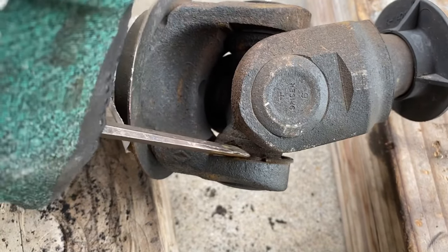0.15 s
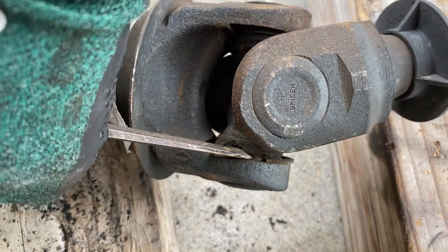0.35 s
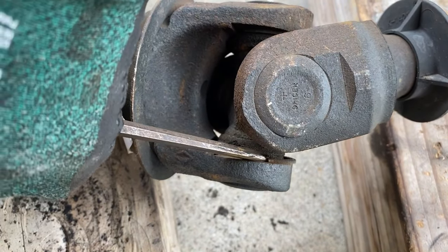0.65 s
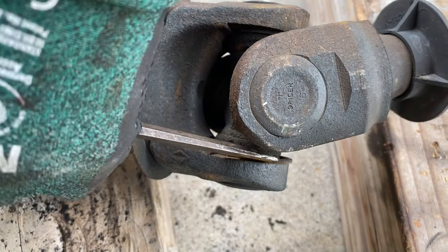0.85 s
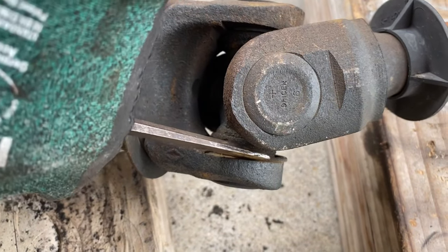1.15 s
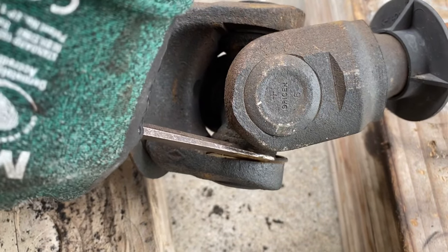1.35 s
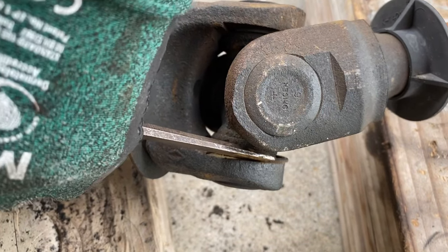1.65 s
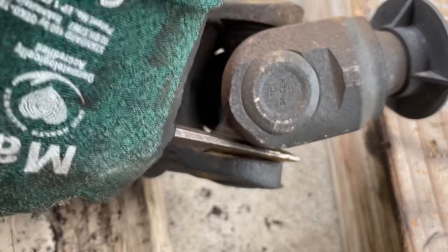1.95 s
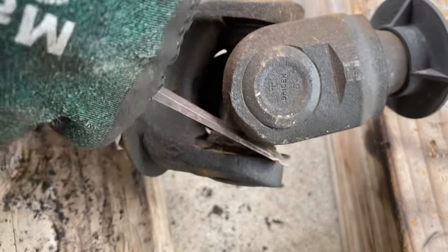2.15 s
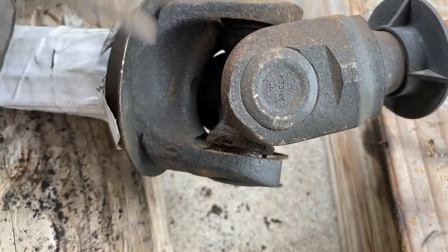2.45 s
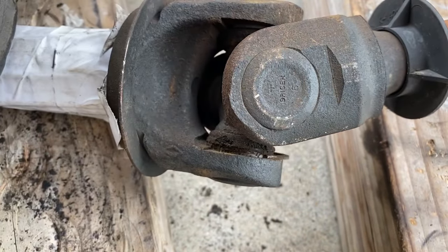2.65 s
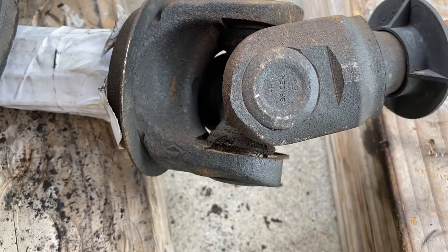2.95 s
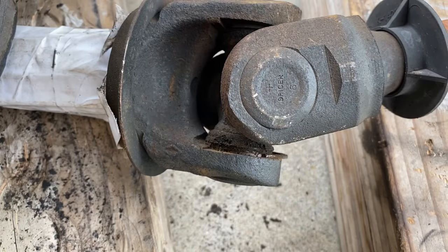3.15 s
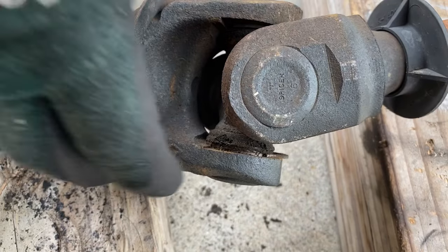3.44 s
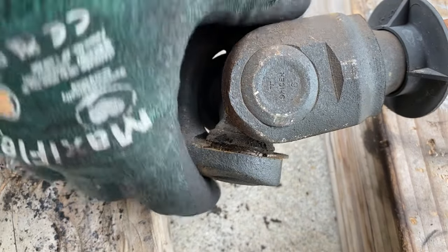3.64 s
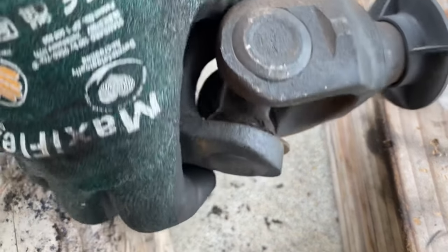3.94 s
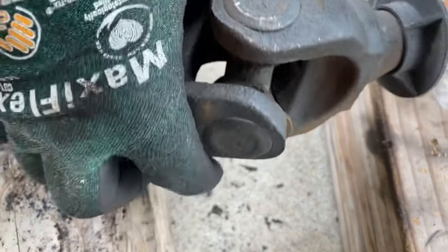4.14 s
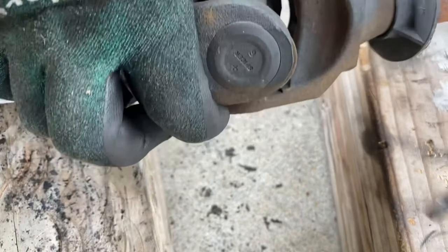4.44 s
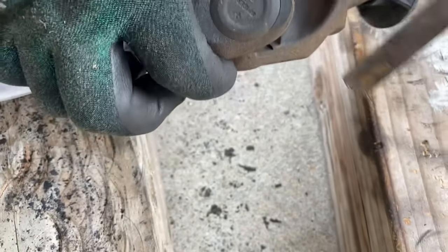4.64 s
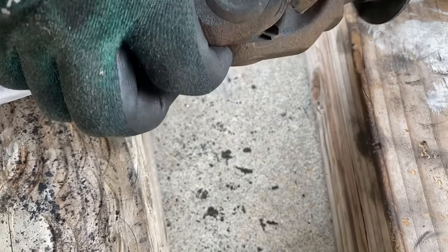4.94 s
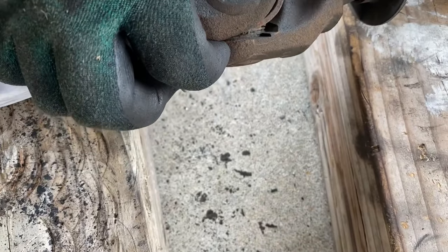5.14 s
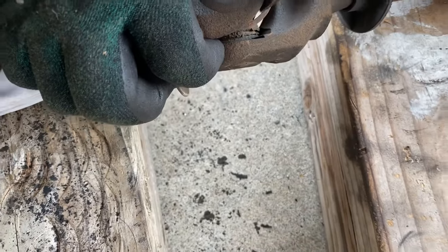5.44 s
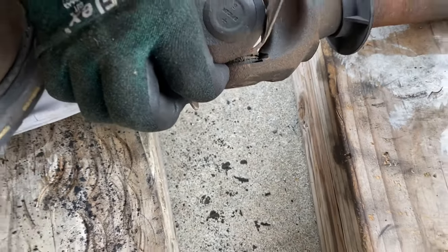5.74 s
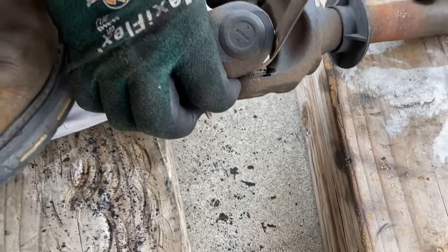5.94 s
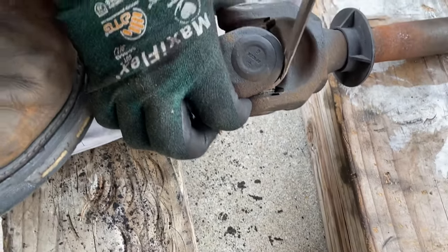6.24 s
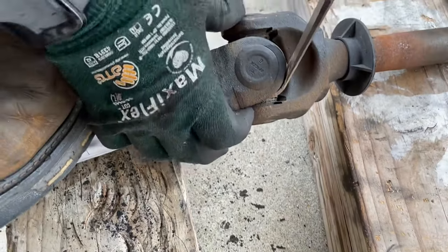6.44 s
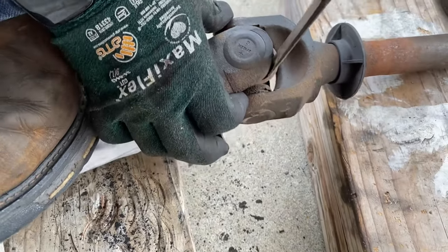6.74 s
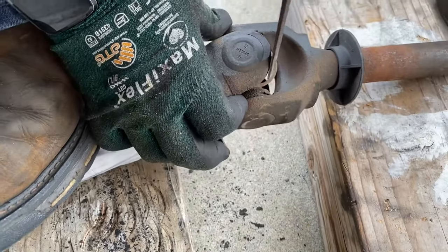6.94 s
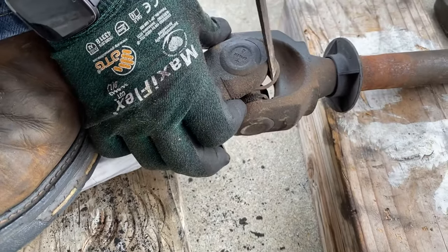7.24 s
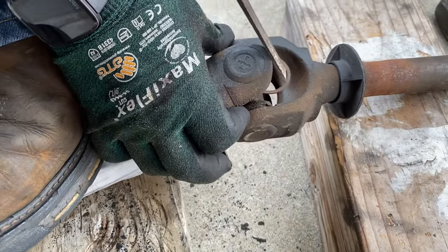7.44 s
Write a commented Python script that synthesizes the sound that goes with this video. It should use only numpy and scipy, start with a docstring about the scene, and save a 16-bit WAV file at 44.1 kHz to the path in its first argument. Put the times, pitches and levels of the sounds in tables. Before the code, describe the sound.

Close outdoor repair sounds: small metallic clacks, a tool clink, gloved rubbing, a dull clattering roll on wood, more picking, and a bright final ping.

```python
"""A steel blade scrapes and clacks on a drive shaft's joint, close to a phone outdoors, over a low rumble.
It slips with a loud crack and is put down; a gloved hand rubs, and the shaft rolls over on timber blocks.
More picking follows, with thin squeaks now and then throughout, until the steel circlip springs free, ringing.
Knocks are fading tones plus a noise crack; scrapes are uneven clicks sent through the same kind of tones.
The glove, the rumble and the echoes are made from shaped noise."""
import sys
import numpy as np
from scipy import signal
from scipy.fft import rfft, irfft, next_fast_len
from scipy.io import wavfile
from scipy.ndimage import uniform_filter1d

SR = 44100
rng = np.random.default_rng(int(sys.argv[2]) if len(sys.argv) > 2 else 0)


def dump_mix(stems):
    """Bounce the given channels to the path in sys.argv[1] as a 16-bit WAV at rate SR."""
    frames = np.atleast_2d(stems).T  # one column per channel
    limited = np.clip(frames, -1, 1)  # hard clip at full scale
    pcm = np.round(limited * 32767).astype(np.int16)
    wavfile.write(sys.argv[1], SR, pcm)


N = 334719
T = np.arange(N) / SR  # time through the scene, s
AGE = T[:SR // 3]  # time since one contact began, s
TOP_HZ = 16400  # upper limit of the sound

# Limits of five pitch ranges: thump, body, clank, tick, sizzle; column: edge_hz
RANGE_EDGES_HZ = (50, 250, 1300, 4000, 11500, 16500)
RANGE_CENTRES_HZ = np.sqrt(np.array(RANGE_EDGES_HZ[:-1]) * np.array(RANGE_EDGES_HZ[1:]))
# Brightness tilts the spectrum about these pitches
STEEL_PIVOT_HZ, TIMBER_PIVOT_HZ = 2260, 560

# Low background rumble, relative; columns: pitch_hz, level_db (per Hz)
RUMBLE_SPECTRUM = [(20, -24), (35, -13.5), (55, -9.5), (76, 4), (101, -5.5), (130, 1), (168, -7),
                   (210, -14), (241, -15), (285, -24), (319, -21), (440, -23), (560, -37), (1500, -54),
                   (6000, -73)]
RUMBLE_DB = -52

# Steel dragged on rusty steel; columns: hardest_s, rise_s, fall_s, strength_db, brightness_db_per_octave
SCRAPE_STROKES = [(0.045, 0.045, 0.043, -44.5, -2.5), (0.58, 0.048, .3, -58, -1.5),
                  (0.69, 0.027, 0.12, -54.5, -5.5), (1.14, 0.034, 0.066, -61, -3),
                  (1.23, 0.018, 0.1, -57.5, -4.5), (1.965, 0.029, 0.03, -49.5, -0.7),
                  (2.179, 0.1, 0.093, -50, 1.6), (4.191, 0.06, 0.12, -42.5, -5.5),
                  (4.945, 0.051, 0.15, -52.5, 0.5), (5.382, .04, 0.045, -48.5, -0.7),
                  (6.2, 0.026, 0.14, -53, 0), (6.6, 0.082, 0.24, -49, 1), (7.429, 0.019, 0.014, -46.5, 1),
                  (7.462, 0.021, 0.031, -26, 1.9)]
# How a scrape shares its energy; columns: thump_db, body_db, clank_db, tick_db, sizzle_db
SCRAPE_BALANCE = (-5, 0.5, 0, -4, -14.5)
# Tones of the joint, relative; columns: pitch_hz, level_db, t60_s (time to fall 60 dB)
JOINT_TONES = [(110, -12, .06), (225, -9, .04), (295, -5, .05), (400, -10, .03), (545, 0, .045),
               (770, -4, .03), (960, -6, .048), (1290, -6, .025), (1710, -3, .025), (2050, -6, .02),
               (2420, -3, .022), (2780, -5, .025), (3000, -1, .03), (4110, -2, .018), (4500, -5, .018),
               (5400, -3, .016), (5780, -4, .016), (6770, -3, .015), (7380, -2, .012), (9840, 4, .01),
               (10400, 4, .01), (13500, -9, .03)]

# Blade on joint, strength before the favoured range is raised; the row at 3.988 s is a bright click that goes
# with a knock of the shaft; columns: start_s, strength_db, brightness_db_per_octave, favoured_hz, crack_t60_s
BLADE_TAPS = [(0.0295, -53, -3.5, 3000, .012), (0.04, -45.5, -1.5, 3400, .011),
              (0.068, -44, -3, 3180, 0.016), (0.137, -52, -7, 914, .006), (0.5359, -60, -2, 2970, .016),
              (0.577, -62.5, -4, 2900, .008), (0.678, -54.5, -3.5, 551, .009),
              (0.734, -39, -2.7, 2850, 0.011), (0.735, -35.5, -4.5, 492, 0.0059),
              (1.2705, -33.5, -5, 956, 0.0084), (1.6381, -23.5, 1, 9800, 0.0078),
              (1.6401, -26.5, -0.6, 3550, 0.024), (2.01, -64.5, 7, 4130, .004),
              (2.122, -58.5, -2, 5800, 0.0036), (2.634, -67.5, 6.5, 5800, .008),
              (3.17, -53.5, -3.5, 1300, .01), (3.188, -56, -4.5, 1300, 0.044),
              (3.988, -48.5, -1.5, 4400, 0.0035), (4.8488, -40.5, -2, 2510, 0.013),
              (4.86, -56.5, -3.5, 2400, 0.0085), (4.9596, -50, -.5, 2050, 0.0071),
              (5.368, -49.5, 3.5, 3990, 0.042), (5.388, -46.5, 2.5, 3870, 0.02),
              (5.389, -52, -2.5, 533, 0.015), (6.186, -59, -2.5, 680, 0.015), (6.33, -62, -1.5, 3000, .012),
              (6.601, -51.5, -0.5, 1288, 0.0096), (6.8062, -35.5, 3, 14800, 0.014),
              (6.808, -54, -4.5, 545, 0.0094), (7.0404, -41, .2, 685, 0.0078),
              (7.066, -43, 0.6, 925, 0.029), (7.4658, -26, 2, 2320, 0.018), (7.562, -51.5, -1, 706, 0.0055)]
# How a tap shares its energy; columns: thump_db, body_db, clank_db, tick_db, sizzle_db
TAP_BALANCE = (-7.5, -3, -0.5, -2, -13.5)
# Where the blade is heard, left or right; columns: time_s, left_minus_right_db
BLADE_POSITION = [(0, 2.5), (1.3, 2), (2.1, -0.5), (4.4, -2), (7.5, 1.7)]

# Thin squeaks, pitch before its waver; columns: start_s, length_s, first_hz, last_hz, level_db
SQUEAK_GLIDES = [(0.137, 0.082, 4500, 3900, -77), (2.647, 0.25, 6250, 6200, -70),
                 (3.04, 0.057, 4500, 3830, -72.5), (4.731, 0.036, 5350, 4990, -71)]

# Strokes of the glove; columns: start_s, length_s (until release), cloth_db, fibre_above_cloth_db
GLOVE_RUBS = [(1.419, 0.12, -65.5, -17), (1.817, 0.06, -67.5, -33.5), (1.948, .31, -62.5, -6.5),
              (2.366, 0.66, -63, -17.5), (2.51, 0.14, -62.5, -0.5), (2.875, 0.11, -58.5, -3),
              (3.195, 0.21, -64, -8), (3.402, 0.19, -54.5, 2), (3.68, 0.65, -57, -6),
              (4.142, 0.06, -43, -15), (4.402, 0.18, -54.5, -1.5), (4.753, 0.19, -60.5, -9),
              (5.189, .16, -66, -1), (5.73, .19, -64, 2.5), (6.008, 0.078, -68, 9.5),
              (6.091, 0.25, -67.5, -4), (6.186, 0.046, -61.5, 9.5), (6.474, 0.23, -62, 1),
              (6.981, 0.44, -65.5, -15.5)]
RUB_ATTACK_S, RUB_RELEASE_T60_S = 0.016, .34
# A firm hold rubs steadily from this time on; fibre level is before the shared fibre setting
GRIP_S, GRIP_CLOTH_DB, GRIP_FIBRE_DB = 2.5, -74, -77
# Soft rush of cloth, relative; columns: pitch_hz, level_db (per Hz)
CLOTH_SPECTRUM = [(200, -2.5), (450, 5.5), (650, -1.5), (950, 5.5), (1500, -2.5), (2250, 0), (3000, -4),
                  (5000, -8), (6700, -11.5), (8500, -19), (12000, -38)]
# Crackle of fibres, relative; columns: pitch_hz, level_db (per Hz)
FIBRE_SPECTRUM = [(3000, -13.5), (6500, -6), (8400, -7), (10200, 2.5), (11200, -3.5), (12200, -11),
                  (13400, 1.5), (14600, -6), (15300, -6.5), (16000, -24)]
# Limits of the bands that waver separately in the cloth's rush; column: edge_hz
PATCH_LIMITS_HZ = (500, 1200, 2200, 3600, 5500, 8000)
PATCH_DB = 1.8  # typical size of that waver

# Tones of the tool, relative; columns: pitch_hz, level_db, t60_s
TOOL_TONES = [(608, -6, .055), (810, -9, .04), (1098, -5, .05), (1230, -7, .035), (1550, 2, .03),
              (1771, -1, .048), (1880, 1, .05), (2562, -11, .05), (3230, 0, .05), (3348, -9, .05),
              (4172, -8, .05), (5749, -4, .045)]
# How the tool shares its energy; columns: thump_db, body_db, clank_db, tick_db, sizzle_db
TOOL_BALANCE = (-35, -7.5, -0.5, -10, -65)
TOOL_S, TOOL_DB, TOOL_CRACK_T60_S = 2.9001, -21, 0.07

# Shaft on timber; columns: start_s, strength_db, brightness_db_per_octave, crack_t60_s
SHAFT_KNOCKS = [(3.07, -47.5, -8.5, .01), (3.5646, -14, -5.5, 0.047), (3.594, -29.5, -11, .026),
                (3.613, -38.5, -16, 0.039), (3.81, -47.5, -1, 0.0065), (3.835, -30.5, -12.5, .02),
                (3.8642, -25, -1, 0.14), (3.874, -13, -2, 0.014), (3.921, -25, -5.5, 0.044),
                (3.949, -25.5, -7.5, 0.013), (3.9709, -23.5, -4.2, 0.01), (3.9869, -24.5, -7, 0.013),
                (4.0002, -26.5, -3, 0.0068), (4.01, -29.5, -6.5, 0.015), (4.0618, -29.5, -8, .02),
                (4.07, -29.5, -9, .02), (4.1, -34.5, -6, 0.05), (4.117, -38, -7.5, .028)]
# How a knock shares its energy; columns: thump_db, body_db, clank_db, tick_db, sizzle_db
KNOCK_BALANCE = (-6.5, 0.5, 0, -12, -21.5)
# Tones of the shaft, relative; columns: pitch_hz, level_db, t60_s
SHAFT_TONES = [(100, 0, .07), (138, -2, .07), (325, -2, .05), (365, 0, .055), (470, -7, .03),
               (560, -5, .035), (781, 3, .035), (960, 0, .025), (1180, 4, .03), (1590, -4, .025),
               (1990, 1, .028), (2360, -10, .03), (2760, -9, .03), (3240, -10, .03), (3900, -12, .025)]
# A knock's upper limit: at brightness 0, its lowest value, and the brightness step that doubles it
KNOCK_HARD_HZ, KNOCK_SOFT_HZ, KNOCK_DOUBLING_DB_PER_OCTAVE = 7800, 1930, 2.7
# Shaft rumbling on timber; columns: hardest_s, rise_s, fall_s, strength_db, brightness_db_per_octave
SHAFT_ROLLS = [(3.58, .01, 0.11, -28.5, -8.5), (3.98, .1, .22, -25, -7)]
# How a roll shares its energy; columns: thump_db, body_db, clank_db, tick_db, sizzle_db
ROLL_BALANCE = (0.5, 0, -0.5, -3.5, -5.5)

# Loose yoke grating as it swings; columns: hardest_s, rise_s, fall_s, strength_db, brightness_db_per_octave
YOKE_SWING = [(4.361, .005, 0.092, -30, -0.5)]
# How the yoke shares its energy; columns: thump_db, body_db, clank_db, tick_db, sizzle_db
YOKE_BALANCE = (-16, -4.5, -0.5, -3.5, -13)
# Tones of the yoke, relative; columns: pitch_hz, level_db, t60_s
YOKE_TONES = [(640, -13.5, 0.052), (1157, -2, 0.11), (1285, -9, .08), (2374, -2, 0.043), (2670, 4, 0.03),
              (3100, 3, 0.026), (3600, 5.5, 0.016), (5070, -1, 0.035), (5260, -5, 0.025),
              (6220, -3.5, 0.042), (7500, -6, 0.041), (10400, -3, .02), (14340, -1, .02)]

# Tones of the freed circlip; columns: pitch_hz, level_db, t60_s
CIRCLIP_TONES = [(2078, -53, .14), (2494, -37, .32), (4274, -45, .085), (6890, -26, .14), (7596, -49, .27),
                 (14314, -29, .23), (14659, -32, .21)]
CIRCLIP_S = 7.4655

# Narrow dips in the microphone's treble; columns: pitch_hz, width_hz, share_removed (0 to 1)
MICROPHONE_DIPS = [(8260, 700, 0.4), (12250, 1500, .95)]


def undb(db):
    """Turn decibels into gain."""
    return 10 ** (np.asarray(db) / 20)


def unit(x):
    """Scale to an rms (average strength) of 1."""
    return x / np.sqrt(np.mean(x ** 2))


def fade(t, t60):
    """Die away exponentially, 60 dB down after t60 seconds."""
    return np.exp(-np.log(1000) * t / t60)


def band(x, lo, hi, order=4):
    """Keep mainly the pitches between lo and hi."""
    sos = signal.butter(order, (lo, min(hi, SR / 2 - 1)), "band", fs=SR, output="sos")
    return signal.sosfilt(sos, x)


def shape(x, points):
    """Give x a smooth spectrum through the points, and rms 1."""
    hz, db = np.transpose(points)
    f = np.maximum(np.fft.rfftfreq(N, 1 / SR), 1)
    gain = undb(np.interp(np.log(f), np.log(hz), db))
    return unit(irfft(rfft(x) * gain, N))


def walk(rate):
    """Wander smoothly about 0 with rms 1, taking `rate` new random values a second."""
    count = int(SR / rate)
    steps = np.repeat(rng.standard_normal(N // count + 1), count)
    return unit(uniform_filter1d(steps, count)[:N])


def add(out, s, x):
    """Mix x into out from time s."""
    i = max(int(s * SR), 0)
    out[:, i:i + x.shape[1]] += x[:, :N - i]


def ring(tones, detune=0.0043):
    """A struck body's fading tones; their signs and slight detuning vary at random from hit to hit."""
    total = 0
    for hz, db, t60 in tones:
        sign = rng.choice([-1, 1])
        actual_hz = hz * (1 + detune * rng.standard_normal())
        total = total + sign * undb(db) * fade(AGE, t60) * np.sin(2 * np.pi * actual_hz * AGE)
    return total


def colour(x, levels_db):
    """Share a contact's energy among the five ranges with a smooth filter that never acts early."""
    size = 2 * len(x)
    f = np.maximum(np.fft.rfftfreq(size, 1 / SR), 1)
    spectrum = rfft(band(x, 70, 15600, order=3), size)
    first = np.searchsorted(f, RANGE_EDGES_HZ)
    knots_db = np.zeros(len(RANGE_CENTRES_HZ))
    for _ in range(6):  # step towards the wanted energies
        gain = undb(np.interp(np.log(f), np.log(RANGE_CENTRES_HZ), knots_db))
        power = np.abs(spectrum * gain) ** 2
        energy = np.add.reduceat(power, first)[:-1] / len(x) / (SR / 100)  # 10 ms reference
        knots_db = knots_db + levels_db - 10 * np.log10(energy)
        # keep any one range from falling too far below its neighbours
        knots_db = np.maximum(knots_db, np.convolve(knots_db, [.5, 0, .5], "same") - 60)
    # folding the cepstrum puts the filter's whole response after the contact
    cepstrum = irfft(np.log(gain))
    folded = np.r_[cepstrum[0], 2 * cepstrum[1:len(x)]]
    return irfft(spectrum * np.exp(rfft(folded, size)))[:len(x)]


def disperse(x, lag_s=.001, at_hz=1000):
    """Bending waves travel slower the lower they are, so each knock falls in pitch."""
    size = 2 * len(x)
    f = np.fft.rfftfreq(size, 1 / SR)
    # lag_s is the delay at at_hz, counted before the delay at TOP_HZ is taken off
    cycles = lag_s * np.sqrt(at_hz) * (2 * np.sqrt(f) - f / np.sqrt(TOP_HZ))
    return irfft(rfft(x, size) * np.exp(-2j * np.pi * cycles))[:len(x)]


def ports(x, left_db, spread=1.0, corner_hz=600):
    """Two microphone ports: alike in the bass, turned apart in phase in the treble."""
    size = next_fast_len(len(x) + SR // 10)
    f = np.fft.rfftfreq(size, 1 / SR)
    knots = np.linspace(0, SR / 2, num=40)
    random_turn = rng.choice([-1, 1]) * rng.uniform(.35, .95, len(knots))  # radians
    treble = f ** 2 / (f ** 2 + corner_hz ** 2)
    turn = spread * treble * np.interp(f, knots, random_turn)
    spectrum = rfft(x, size)
    heard = []
    for side in (1, -1):  # left, then right
        turned = irfft(spectrum * np.exp(1j * side * turn), size)[:len(x)]
        heard.append(undb(side * left_db / 2) * turned)
    return np.array(heard)


def voiced(balance_db, strength_db, brightness, pivot_hz):
    """A contact's range levels: brightness tilts all but the thump, which follows strength alone."""
    octaves = np.log2(RANGE_CENTRES_HZ / pivot_hz)
    return strength_db + np.array(balance_db) + brightness * np.r_[0, octaves[1:]]


def blow(tones, crack_t60, crack_db, levels_db):
    """A contact: the body's main tones, plus a short crack from its countless damped higher ones."""
    noise = band(rng.standard_normal(len(AGE)), 700, TOP_HZ, order=1)
    crack = noise * fade(AGE, crack_t60)
    return disperse(colour(ring(tones) + undb(crack_db) * crack, levels_db))


def drag(out, strokes, tones, balance_db, pivot_hz, grit_db, hiss_db, judder_db=3):
    """Rough surfaces catch and slip: dense uneven clicks that hiss and make the body's tones ring."""
    for hardest, rise, fall, strength_db, brightness in strokes:
        swell = np.minimum(AGE / rise, 1)
        die_away = undb(-18 * np.maximum(AGE - rise, 0) / fall)  # 18 dB down after `fall`
        close = np.minimum(10 * (1 - AGE / AGE[-1]), 1)
        judder = judder_db * walk(120)[:len(AGE)]
        grit = grit_db * np.minimum(rng.exponential(size=len(AGE)), 4)
        grains = swell * die_away * close * undb(judder + grit) * rng.standard_normal(len(AGE))
        rung = signal.fftconvolve(grains, ring(tones))[:len(AGE)]
        levels = voiced(balance_db, strength_db, brightness, pivot_hz)
        rubbed = colour(unit(rung) + undb(hiss_db) * unit(grains), levels)
        add(out, hardest - rise, ports(rubbed, left_db=2.5))


def rumble(air_db=-83):
    """Distant low rumble, nearly the same at both ports, and a trace of hiss."""
    mid = shape(rng.standard_normal(N), RUMBLE_SPECTRUM) * undb(RUMBLE_DB + 0.42 * walk(2.6))
    side = shape(rng.standard_normal(N), RUMBLE_SPECTRUM) * undb(RUMBLE_DB - 11)
    air = undb(air_db) * unit(band(rng.standard_normal((2, N)), 300, 2500, order=1))
    return np.array([mid + side, mid - side]) + air


def scrapes(out):
    """Steel drags on rusty steel, and its gritty catching makes the joint ring."""
    drag(out, SCRAPE_STROKES, JOINT_TONES, SCRAPE_BALANCE, STEEL_PIVOT_HZ, grit_db=7, hiss_db=4.0)


def surroundings(x, early_db=-18, early_t60=0.13, late_db=-24, late_t60=.42):
    """The ground and nearby things scatter the sound; walls return a faint, duller tail."""
    t = T[:SR // 2]
    onset = np.clip(t / 0.0046 - 1, 0, 1)  # silent for 4.6 ms, full after 9.2 ms
    early, late = rng.standard_normal((2, 2, len(t))) * onset
    early = early * fade(t, early_t60)
    late = band(late, 400, 8000, order=1) * fade(t, late_t60)
    echo = (undb(early_db) * unit(early) + undb(late_db) * unit(late)) / np.sqrt(len(t))
    return signal.fftconvolve(x, echo, axes=1)[:, :N]


def blade(out, favour_db=10, favour_octaves=0.086, swell_db=7, swell_octaves=1.05):
    """The blade clacks on the joint; each contact point brings out one pitch and the range around it."""
    for s, strength_db, brightness, favoured_hz, crack_t60 in BLADE_TAPS:
        def near(hz, octaves):
            """Closeness to the favoured pitch, 1 at most."""
            return np.exp(-(np.log2(hz / favoured_hz) / octaves) ** 2)

        tones = [(hz, db + favour_db * near(hz, favour_octaves), t60) for hz, db, t60 in JOINT_TONES]
        levels = voiced(TAP_BALANCE, strength_db, brightness, STEEL_PIVOT_HZ)
        levels = levels + swell_db * near(RANGE_CENTRES_HZ, swell_octaves)
        left_db = np.interp(s, *np.transpose(BLADE_POSITION))
        tap = blow(tones, crack_t60, crack_db=16.5, levels_db=levels)
        add(out, s, ports(tap, left_db))


def squeaks(out, waver=0.024):
    """Faint whistles whose pitch glides and wavers."""
    for s, length, first_hz, last_hz, db in SQUEAK_GLIDES:
        t = np.linspace(0, 1, int(length * SR))
        glide_hz = np.interp(t, [0, 1], [first_hz, last_hz])
        hz = glide_hz * (1 + waver * walk(900)[:len(t)])
        whistle = np.sin(np.pi * t) * np.sin(2 * np.pi * np.cumsum(hz) / SR)
        add(out, s, ports(undb(db) * unit(whistle), left_db=1))


def stroke(start, length):
    """Strength of one rub: attack, hold, release."""
    attack = np.clip((T - start) / RUB_ATTACK_S, 0, 1)
    return attack * fade(np.clip(T - start - length, 0, 1), RUB_RELEASE_T60_S)


def restless(x, wander_db):
    """The rubbing patch shifts, so each part of the spectrum swells and fades on its own."""
    total = x
    for lo, hi in zip(PATCH_LIMITS_HZ, PATCH_LIMITS_HZ[1:]):
        total = total + band(x, lo, hi, order=2) * (undb(wander_db * walk(22)) - 1)
    return unit(total)


def glove(fibre_db=-2.0, grain_db=3.5):
    """A knitted glove rubs on steel: a soft rush, a fine crackle of fibres and some grains of rust."""
    rubs = [(stroke(start, length), db, db + hiss_db) for start, length, db, hiss_db in GLOVE_RUBS]
    rubs.append((stroke(GRIP_S, T[-1]), GRIP_CLOTH_DB, GRIP_FIBRE_DB))
    cloth_gain = np.sqrt(sum((force * undb(db)) ** 2 for force, db, _ in rubs))
    fibre_gain = np.sqrt(sum((force * undb(db)) ** 2 for force, _, db in rubs))

    rush = restless(shape(rng.standard_normal(N), CLOTH_SPECTRUM), PATCH_DB)
    cloth = rush * cloth_gain * undb(1.4 * walk(25))

    snags = rng.standard_normal(N) * undb(grain_db * np.minimum(rng.exponential(size=N), 7))
    flutter_db = 1.8 * walk(110) + 1.1 * walk(24)
    fibres = shape(snags, FIBRE_SPECTRUM) * fibre_gain * undb(fibre_db + flutter_db)

    # about twelve grains of rust a second, following the strength of the fibre hiss
    grain_sizes = undb(9 + 3 * np.clip(rng.standard_normal(N), -2, 2))
    grains = (rng.random(N) < 12 / SR) * grain_sizes
    grain_noise = unit(band(rng.standard_normal(N), 1800, 13000, order=2))
    grit = signal.fftconvolve(grains, fade(AGE, .012))[:N] * grain_noise
    return ports(cloth + fibres + grit * fibre_gain, left_db=2.0)


def tool(out):
    """The tool is put down with one short clink of its own tones."""
    levels = TOOL_DB + np.array(TOOL_BALANCE)
    clink = blow(TOOL_TONES, TOOL_CRACK_T60_S, crack_db=-0.5, levels_db=levels)
    add(out, TOOL_S, ports(clink, left_db=1.5))


def shaft(out):
    """The heavy shaft drops and judders on timber; soft wood limits the treble, most in dull knocks."""
    for s, strength_db, brightness, crack_t60 in SHAFT_KNOCKS:
        levels = voiced(KNOCK_BALANCE, strength_db, brightness, TIMBER_PIVOT_HZ)
        knock = blow(SHAFT_TONES, crack_t60, crack_db=11.5, levels_db=levels)
        contact_hz = KNOCK_HARD_HZ * 2 ** (brightness / KNOCK_DOUBLING_DB_PER_OCTAVE)
        contact_hz = max(contact_hz, KNOCK_SOFT_HZ)
        add(out, s, ports(band(knock, 60, contact_hz, order=5), left_db=-0.1))


def rolls(out):
    """The shaft rumbles as it rolls, its tones excited by rubbing on the timber."""
    drag(out, SHAFT_ROLLS, SHAFT_TONES, ROLL_BALANCE, TIMBER_PIVOT_HZ, grit_db=1.5, hiss_db=0)


def yoke(out):
    """The loose yoke swings and grates to a stop, ringing with its own tones."""
    drag(out, YOKE_SWING, YOKE_TONES, YOKE_BALANCE, STEEL_PIVOT_HZ, grit_db=3.5, hiss_db=3, judder_db=4.0)


def circlip(out):
    """The freed steel rings on with a few clean, mostly high tones."""
    add(out, CIRCLIP_S, ports(ring(CIRCLIP_TONES, detune=0), left_db=1.5, spread=.7))


def scene(shaft_room_db=-4):
    """Work, echoes and background; the shaft, low on its blocks, stirs weaker echoes."""
    steel, timber = np.zeros((2, 2, N))
    scrapes(steel)
    blade(steel)
    squeaks(steel)
    tool(steel)
    shaft(timber)
    rolls(timber)
    yoke(steel)
    circlip(steel)
    echoes = surroundings(steel + undb(shaft_room_db) * timber)
    return steel + timber + echoes + glove() + rumble()


def record(dry):
    """The phone's microphone has two dips in the treble, and the top is cut."""
    for hz, width_hz, share in MICROPHONE_DIPS:
        peak = signal.lfilter(*signal.iirpeak(hz, hz / width_hz, fs=SR), dry)
        dry = dry - share * peak
    return signal.sosfilt(signal.ellip(8, .2, 70, TOP_HZ, fs=SR, output="sos"), dry)


dry = scene()
out = record(dry)
dump_mix(out)
```